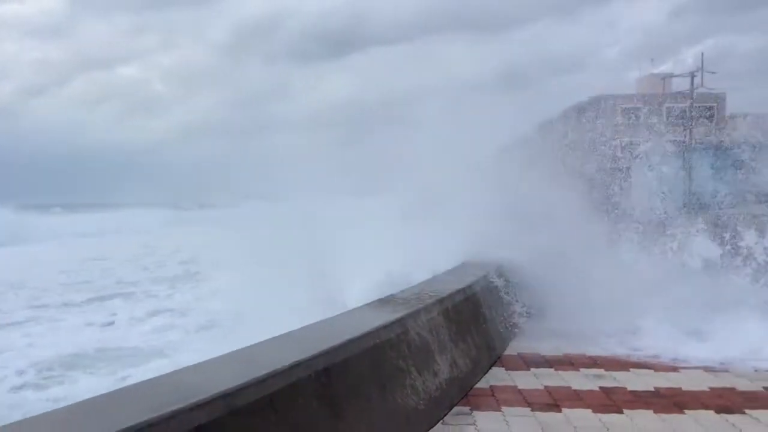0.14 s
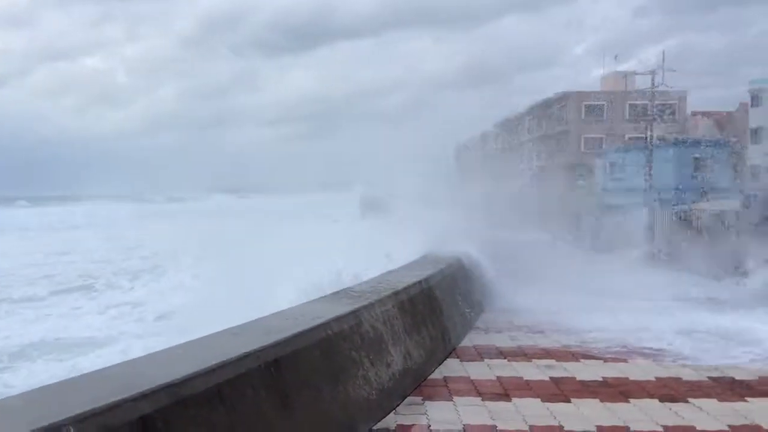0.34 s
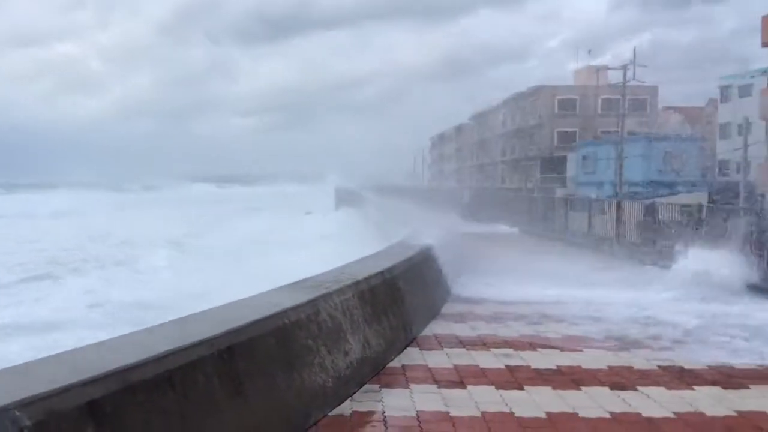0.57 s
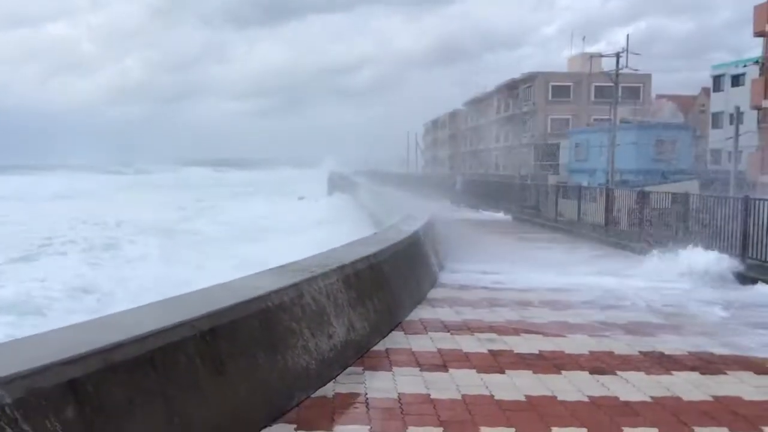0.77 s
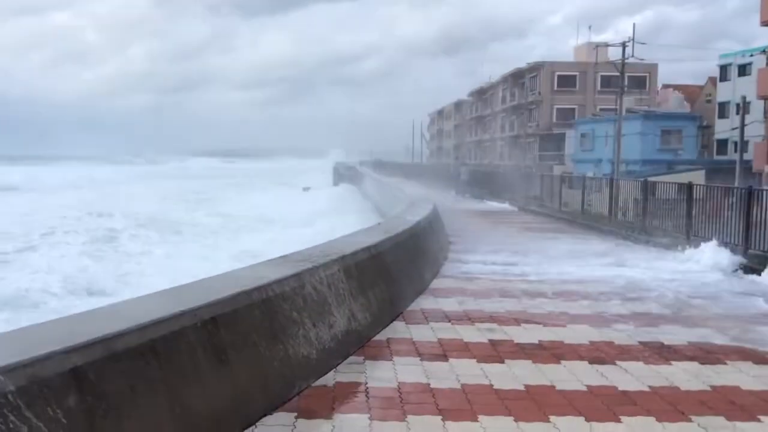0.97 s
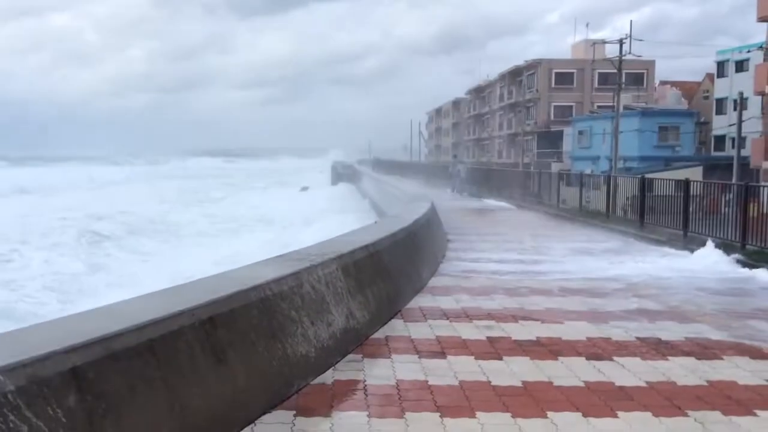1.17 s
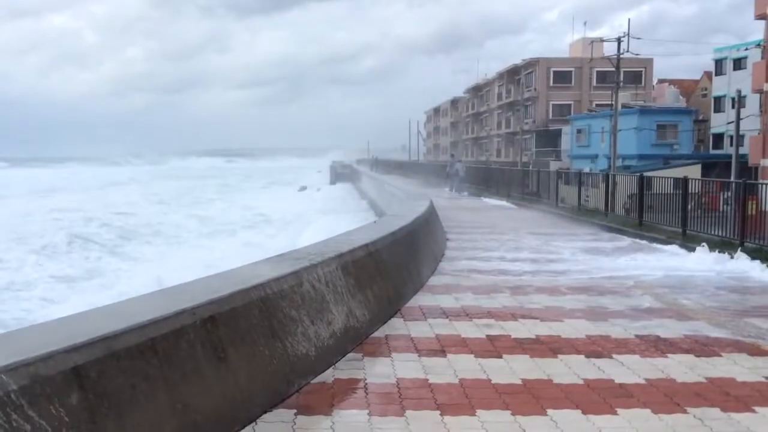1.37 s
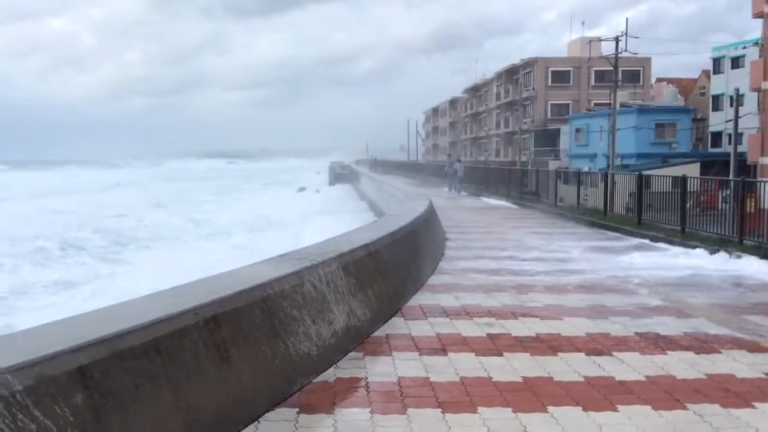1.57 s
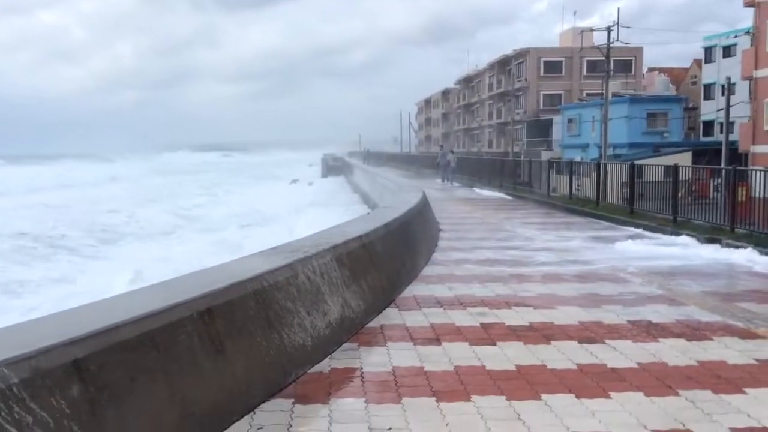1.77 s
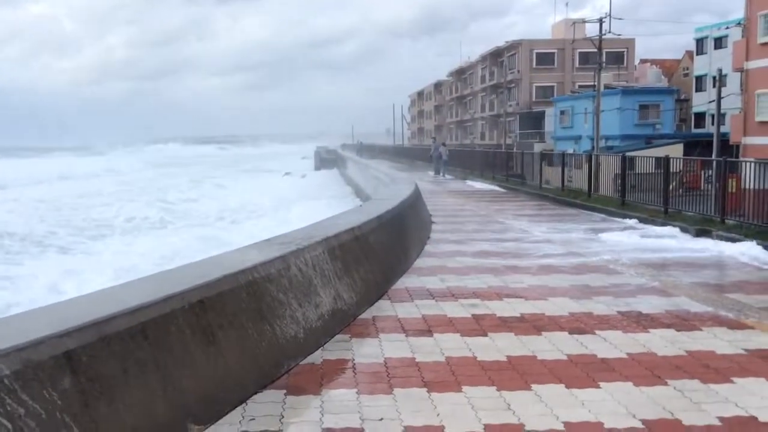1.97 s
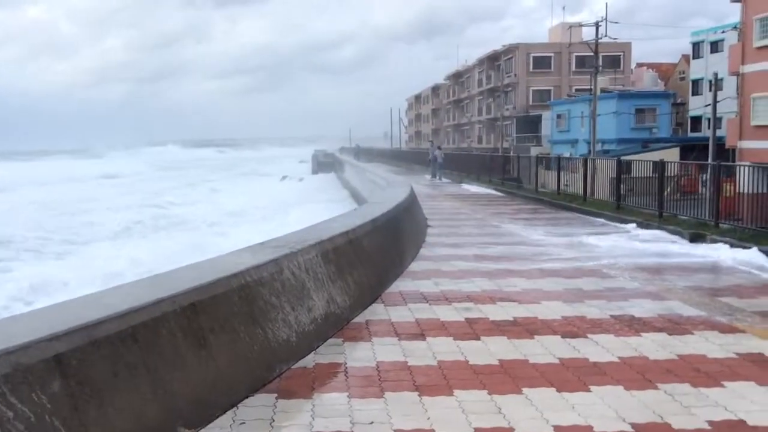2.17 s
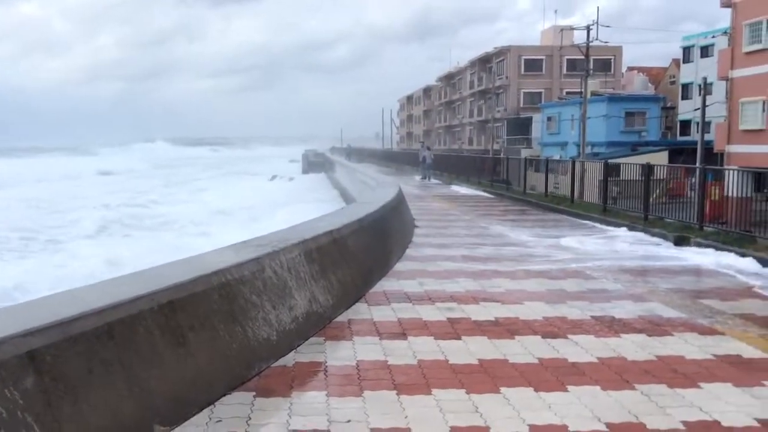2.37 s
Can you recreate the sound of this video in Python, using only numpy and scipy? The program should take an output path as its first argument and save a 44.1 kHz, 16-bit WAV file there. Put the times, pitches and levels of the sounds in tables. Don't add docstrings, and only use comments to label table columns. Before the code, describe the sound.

Wave water crashes and patters close by on hard paving, fading into small surges and a few plops, over steady low surf roar and strong wind buffeting of the unprotected microphone, in mono.

```python
import sys
import numpy as np
from scipy import signal
from scipy.fft import rfft, irfft, next_fast_len
from scipy.io import wavfile
from scipy.ndimage import uniform_filter1d

SR = 44100
rng = np.random.default_rng(int(sys.argv[2]) if len(sys.argv) > 2 else 0)


def field_ratio(decibels):
    return 10 ** (np.asarray(decibels, dtype=float) / 20)


def store_pcm(level_fs):
    pcm = np.round(np.clip(level_fs, -1, 1) * 32767).astype(np.int16)
    wavfile.write(sys.argv[1], SR, np.atleast_2d(pcm).T)


N = 111573

# time_s, level_db
FALL_LEVEL = [(0, -57.5), (.1, -58), (.28, -57), (.45, -60.5), (.7, -66.5), (.95, -66.5), (1.4, -73.5),
              (1.8, -74), (2.53, -80)]
# frequency_hz, density_db
FALL_COLOUR = [(600, -4.5), (950, 2), (1200, -6), (1500, -15), (2200, -9), (3000, -18.5), (4400, -23.5),
               (5600, -22)]
# frequency_hz, density_db
CURTAIN_COLOUR = [(4700, -6), (5350, 6), (5800, 2), (6600, -9), (10500, -4.5), (12500, -20), (15300, -22)]
# centre_s, peak_db, pitch_hz
SLUGS = [(0.024, -53.5, 967), (0.0449, -50, 980), (0.0762, -55.6, 930), (0.1007, -53.4, 1020),
         (0.1215, -53, 875), (0.1547, -58.5, 1013), (0.1734, -55.5, 1030), (0.2006, -67, 950),
         (0.2162, -69, 1164), (0.2329, -78, 980), (0.2553, -56, 1290), (0.2782, -62, 1190),
         (0.2954, -60, 1070), (0.3315, -55, 950), (0.3557, -51, 967), (0.3848, -45, 1030),
         (0.4139, -52, 882), (0.4381, -56.4, 860), (0.4572, -47, 860), (0.4891, -48, 1013),
         (0.5115, -56, 940), (0.5501, -63, 870), (0.5835, -61, 842), (0.5997, -56, 800), (0.6267, -49, 990),
         (0.6553, -61, 967), (0.6741, -59.7, 910), (0.7007, -45, 780), (0.7318, -52, 754),
         (0.7475, -48, 940), (0.7752, -53, 855), (0.791, -70, 924), (0.8236, -55, 924), (0.8724, -70, 890),
         (0.8913, -64.1, 1330), (0.9288, -69, 924)]
# peak_s, level_db, rise_s, fade_s
SURGES = [
    (1.4, -68.5, 0.16, 0.26),
    (1.82, -74.5, 0.075, 0.25),
    (2.4, -80, 0.086, 0.17),
]
# frequency_hz, density_db
WASH_COLOUR = [(700, -8), (1200, 2.5), (2000, 3), (3000, -4), (5000, -11), (8000, -5)]
# time_s, level_db
SPRAY_LEVEL = [(0, -69.5), (.1, -68.5), (.2, -66), (.28, -65.5), (.4, -68.5), (.55, -71.5), (.72, -69.5),
               (.85, -72), (1.15, -73), (1.33, -71), (1.46, -71.5), (1.58, -72), (1.88, -72.5), (2.0, -75),
               (2.53, -74.5)]
# frequency_hz, density_db
SPRAY_COLOUR = [(2500, -11.5), (4400, -11), (5500, -4), (7800, 0.5), (9500, -6), (10500, -11.5),
                (13000, -20.5), (15300, -30)]
# start_s, peak_db, pitch_hz, t60_s
PLOPS = [
    (.085, -44, 410, .12),
    (1.342, -52, 1200, .045),
    (1.369, -57, 1170, .025),
    (1.4215, -56, 1050, .014),
    (1.786, -55, 1300, .02),
    (1.815, -56, 1350, .04),
]
# start_s, peak_db
TICKS = [
    (1.42328, -42),
]
# time_s, level_db
SURF_LEVEL = [(0.0, -54), (0.11, -46.5), (0.13, -51.5), (0.76, -51.5), (0.79, -48), (0.82, -51.5),
              (1.06, -53.5), (1.07, -51), (1.37, -53), (1.89, -52), (1.92, -53), (2.53, -51)]
# frequency_hz, density_db
SURF_COLOUR = [(120, -4), (190, -1.5), (300, -5), (450, -10), (620, -18), (1300, -28), (2200, -35),
               (4400, -42.5)]
# centre_s, peak_db, pitch_hz
GULPS = [(0.0818, -44, 399), (0.1098, -44, 424), (0.1495, -50, 390), (0.2139, -50.1, 378),
         (0.2857, -42.5, 342), (0.3578, -45, 444), (0.3939, -45.5, 326), (0.4322, -49.5, 350),
         (0.4724, -44.5, 215), (0.5067, -53, 295), (0.5337, -48, 350), (0.5632, -43, 320),
         (0.6156, -60, 254), (0.6495, -42, 331), (0.6909, -44.5, 354), (0.7571, -46.5, 243),
         (0.7875, -40, 242), (0.8178, -43, 310), (0.8552, -46, 314), (0.8825, -50, 240),
         (0.9543, -43.5, 300), (1.0047, -49.4, 313), (1.07, -42.5, 197), (1.1214, -41.5, 192),
         (1.1917, -41.5, 183), (1.2698, -45, 375), (1.5546, -42, 256), (1.6111, -48, 370),
         (1.7303, -42.5, 220), (1.8142, -44.5, 202), (1.8829, -42.5, 328), (1.9637, -50, 190),
         (2.0479, -49, 195), (2.1498, -48.5, 267), (2.1944, -42, 212), (2.3197, -51.5, 380),
         (2.3814, -45, 435), (2.4151, -43.5, 261), (2.4669, -46, 338), (2.5188, -47, 410)]
# centre_s, peak_db, pitch_hz
EDDIES = [(0.0344, -38.5, 68), (0.0836, -38.5, 113), (0.1687, -31.5, 64), (0.2258, -38, 105),
          (0.2674, -36.5, 87), (0.3121, -35, 68), (0.3513, -45, 152), (0.4025, -35, 101),
          (0.4559, -40.5, 56), (0.5066, -36.5, 69), (0.549, -40.5, 126), (0.631, -33, 91),
          (0.7173, -34, 99), (0.7488, -38, 123), (0.7781, -39.5, 76.4), (0.803, -36.5, 133),
          (0.8283, -40, 76.5), (0.9239, -35.1, 94), (0.9692, -39, 137), (0.9953, -42, 128),
          (1.0246, -30.6, 122), (1.0545, -37.5, 89), (1.0944, -49, 61), (1.122, -46, 152),
          (1.1546, -33.5, 76.6), (1.1843, -34, 73.6), (1.2217, -36.4, 137), (1.2459, -40, 151),
          (1.2955, -36.5, 81), (1.3229, -39.5, 146), (1.3558, -33, 87), (1.4284, -36.5, 76),
          (1.4624, -35.5, 90), (1.5081, -46, 62), (1.548, -44, 126), (1.6068, -37, 70),
          (1.6221, -36.5, 91), (1.6718, -31.5, 77), (1.704, -30, 86), (1.7399, -33.5, 107),
          (1.7819, -39, 151), (1.8421, -38.4, 93), (1.8798, -43.5, 123), (1.9036, -40.4, 122),
          (1.933, -38, 104), (1.9836, -35.5, 87), (2.0095, -37, 115), (2.0433, -35.5, 63.4),
          (2.1534, -48, 68), (2.1851, -32.5, 80), (2.2257, -42, 150), (2.3279, -37.5, 100),
          (2.3494, -33.5, 67.5), (2.4492, -36, 97), (2.482, -40.5, 135), (2.5093, -37.8, 60.6)]
# centre_s, peak_db, pitch_hz
MORE_EDDIES = [(.052, -36, 62), (.132, -45, 60), (0.191, -38, 49), (0.698, -39.5, 71), (.59, -49, 71.5),
               (0.868, -44, 69.4), (1.077, -35, 55), (1.225, -38.5, 56.5), (1.381, -37, 73),
               (1.576, -40, 70), (1.644, -43, 68), (1.775, -42.5, 55), (.965, -37, 86), (1.51, -43, 51),
               (1.86, -37, 61.1), (2.138, -41, 77), (2.28, -39.5, 61.6), (2.401, -38.5, 69.5)]
# time_s, level_db
GUST_LEVEL = [(0.0, -40.5), (0.57, -40), (0.93, -37), (1.19, -41), (1.37, -40.5), (1.66, -35), (1.83, -43),
              (1.94, -36), (2.28, -39), (2.42, -43), (2.53, -35)]
# frequency_hz, density_db
WIND_COLOUR = [(15, -40), (25, -5.5), (45, 0.5), (65, -0.5), (95, -5.5), (150, -9), (260, -30.5),
               (600, -59)]


def splash():
    curtain_db, curtain_end_s, curtain_fade_s = -70, 0.3, 0.25
    after_s = np.maximum(np.arange(N) / SR - curtain_end_s, 0)
    curtain_gain = field_ratio(curtain_db) * np.exp(-after_s / curtain_fade_s)
    curtain = curtain_gain * coloured(drops(), CURTAIN_COLOUR, shared_db=0.3, own_db=1.3, rate_hz=25.0)
    fall_gain = field_ratio(in_time(FALL_LEVEL) - 0.85)
    fall = fall_gain * coloured(drops(), FALL_COLOUR, shared_db=0.06, own_db=3.0, rate_hz=13.0)
    return curtain + fall


def slugs():
    return swings(SLUGS, cycles=4.0, trim_db=-7.5)


def drops():
    drops_per_s, spread_db, impact_share = 4000, 3.5, 0.42
    sizes = field_ratio(spread_db * np.minimum(rng.exponential(1, N), 5))
    sizes = sizes * rng.choice([-1, 1], N)
    impacts = rms_one(sizes * (rng.random(N) < drops_per_s / SR))
    merged = rng.standard_normal(N)
    return np.sqrt(impact_share) * impacts + np.sqrt(1 - impact_share) * merged


def wash():
    t = np.arange(N) / SR
    gain = np.zeros(N)
    for peak_s, db, rise_s, fade_s in SURGES:
        gain += field_ratio(db) * np.exp(-np.where(t < peak_s, (peak_s - t) / rise_s, (t - peak_s) / fade_s))
    return gain * coloured(drops(), WASH_COLOUR, shared_db=1.0, own_db=1.8, rate_hz=21.0)


def spray():
    hiss = coloured(rng.standard_normal(N), SPRAY_COLOUR, shared_db=0.1, own_db=0.7, rate_hz=10.0)
    return field_ratio(in_time(SPRAY_LEVEL) + 1.5) * hiss


def plops():
    pitch_rise, attack_s = 0.034, 0.0016
    out = np.zeros(N)
    for start_s, db, hz, t60_s in PLOPS:
        t = np.maximum(np.arange(N) / SR - start_s, 0)
        envelope = (1 - np.exp(-t / attack_s)) * field_ratio(db - 60 * t / t60_s)
        bend = 1 + pitch_rise * np.minimum(t / t60_s, 1)
        out += envelope * np.sin(2 * np.pi * hz * t * bend)
    return out


def tick():
    settle_s = 0.0006
    t = np.arange(N) / SR
    out = np.zeros(N)
    for start_s, db in TICKS:
        out -= field_ratio(db) * (t >= start_s) * np.exp(-np.maximum(t - start_s, 0) / settle_s)
    return out


def surf():
    roar = coloured(rng.standard_normal(N), SURF_COLOUR, shared_db=-1.44, own_db=0.0, rate_hz=1.25)
    return field_ratio(in_time(SURF_LEVEL)) * roar


def gulps():
    return swings(GULPS, cycles=2.83, trim_db=-4.5)


def eddies():
    return swings([*EDDIES, *MORE_EDDIES], cycles=0.98, trim_db=-1)


def wind():
    even_s, evenness = 0.05, 0.6
    air = coloured(rng.standard_normal(N), WIND_COLOUR, shared_db=-0.5, own_db=-3.3, rate_hz=2.45)
    size = np.sqrt(uniform_filter1d(air ** 2, int(even_s * SR)) + 0.012)
    size = uniform_filter1d(size, int(even_s * SR / 2))
    return field_ratio(in_time(GUST_LEVEL) - 7.5) * rms_one(air / size ** evenness)


def swings(rows, cycles, trim_db):
    out = np.zeros(N)
    for centre_s, db, hz in rows:
        reach_s = 3 * cycles / hz
        first = max(int((centre_s - reach_s) * SR), 0)
        last = min(int((centre_s + reach_s) * SR), N)
        i = np.arange(first, last)
        turns = (i / SR - centre_s) * hz
        out[i] += field_ratio(db + trim_db) * np.exp(-(turns / cycles) ** 2) * np.cos(2 * np.pi * turns)
    return out


def coloured(source, spectrum, shared_db, own_db, rate_hz):
    size = next_fast_len(N)
    octave = np.log2(np.arange(size // 2 + 1) * SR / size + 1)
    hz, db = np.transpose(spectrum)
    corners = np.log2(np.r_[hz[0] / 2, hz, hz[-1] * 2])
    level_db = np.interp(octave, corners, np.r_[db[0] - 40, db, db[-1] - 40])
    shaped = rfft(source, size) * field_ratio(level_db)
    together = drift(rate_hz)
    out = np.zeros(N)
    for centre in np.arange(3, 14.6, 0.5):
        alone = drift(rate_hz)
        if hz[0] / 2.5 < 2 ** centre < hz[-1] * 2.5:
            window = np.clip(1 - 2 * abs(octave - centre), 0, 1)
            band = irfft(shaped * window, size)[:N]
            out += band * field_ratio(shared_db * together + own_db * alone)
    return rms_one(out)


def drift(rate_hz):
    step = 40
    pole = np.exp(-2 * np.pi * rate_hz * step / SR)
    noise = rng.standard_normal(N // step + 2002)
    slow = signal.lfilter([1], [1, -2 * pole, pole * pole], noise)[2000:]
    return np.interp(np.arange(N) / step, np.arange(len(slow)), rms_one(slow))


def in_time(rows):
    time_s, value = np.transpose(rows)
    return np.interp(np.arange(N) / SR, time_s, value)


def rms_one(x):
    return x / np.sqrt(np.mean(x ** 2) + 1e-20)


def scene():
    water = splash() + slugs() + wash() + spray() + plops() + tick()
    background = surf() + gulps() + eddies() + wind()
    return (water + background)[None]


def roll_off(x):
    return signal.sosfilt(signal.butter(12, 15290, fs=SR, output="sos"), x)


def record(dry):
    return roll_off(dry)


dry = scene()
out = record(dry)
store_pcm(out)
```